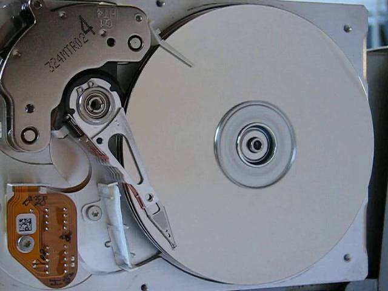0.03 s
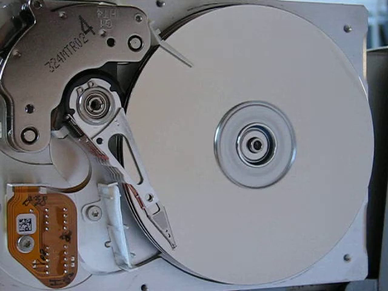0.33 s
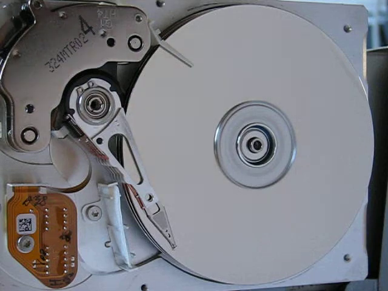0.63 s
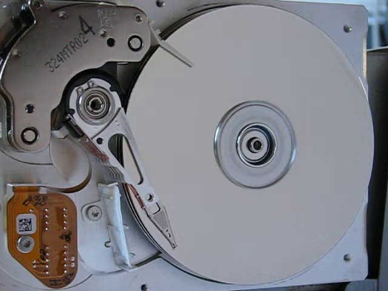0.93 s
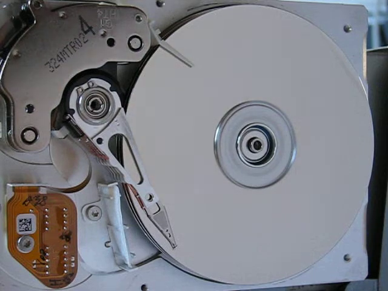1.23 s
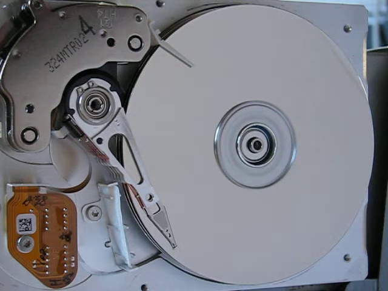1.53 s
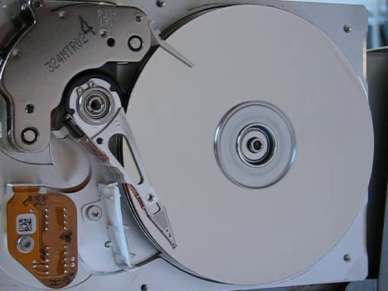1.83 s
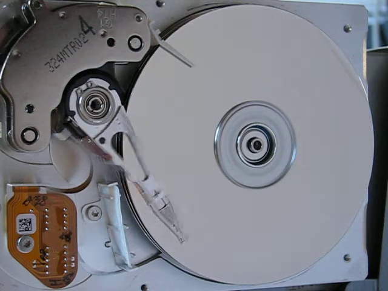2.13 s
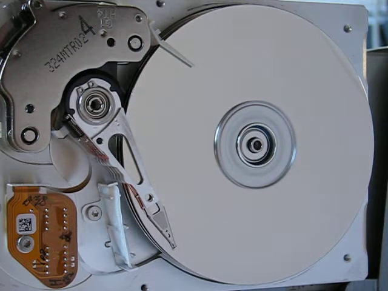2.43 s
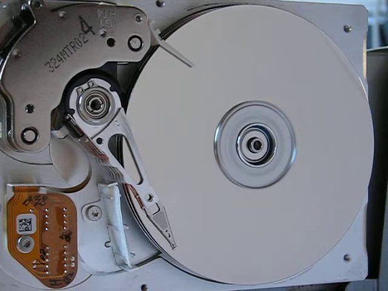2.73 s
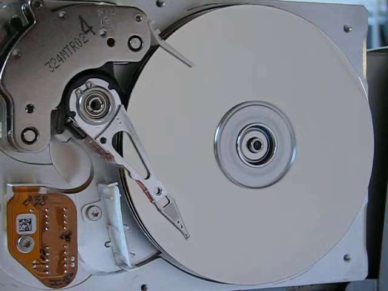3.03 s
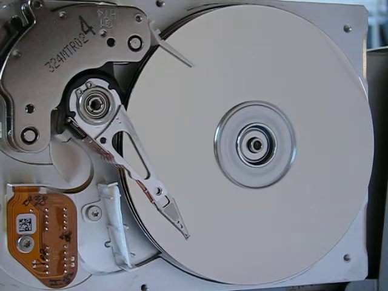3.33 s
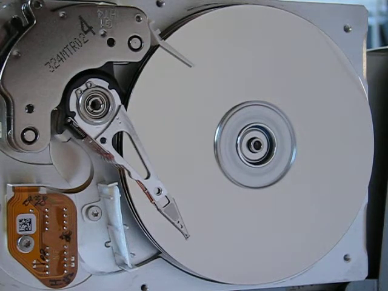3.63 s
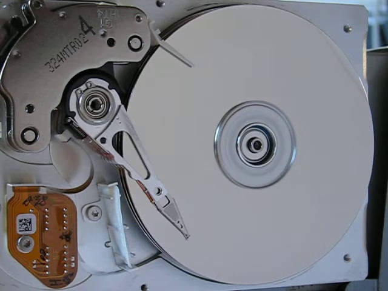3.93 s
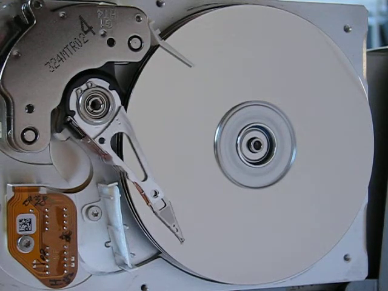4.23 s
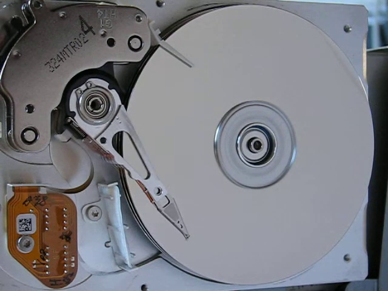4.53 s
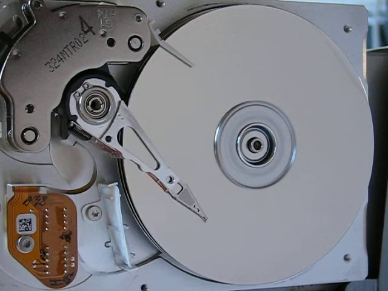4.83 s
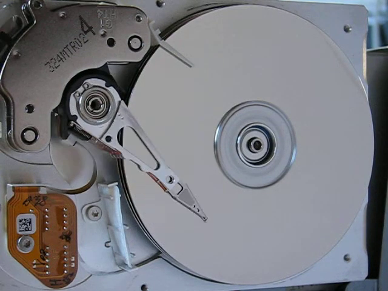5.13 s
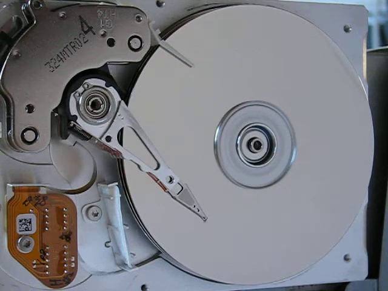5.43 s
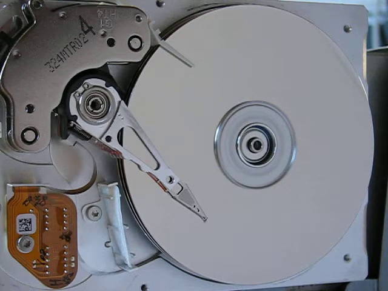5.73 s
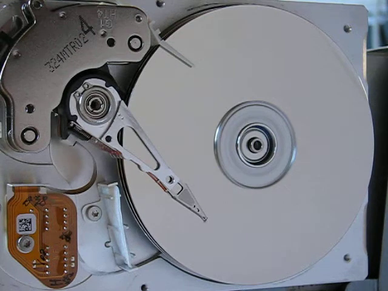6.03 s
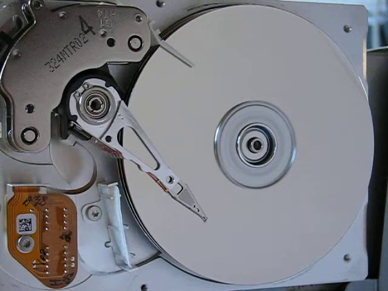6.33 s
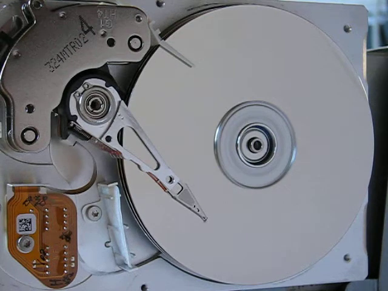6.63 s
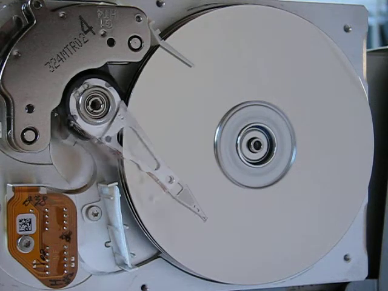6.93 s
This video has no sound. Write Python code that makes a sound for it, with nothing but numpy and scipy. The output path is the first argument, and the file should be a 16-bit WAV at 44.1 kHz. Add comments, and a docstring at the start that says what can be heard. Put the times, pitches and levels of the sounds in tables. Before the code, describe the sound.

An open hard drive hisses and whirs steadily up close, with a thin on-and-off whine and irregular clusters of read arm clicks.

```python
"""An opened hard drive at 5400 rpm, close up, just under a stereo microphone.
As the level fades in, air torn along by the platters is already hissing in the case, bearing and motor
add steady tones, and the head assembly whines on a track, as it will on and off throughout.
From about one second the read arm seeks in irregular clusters, three kicks of its voice coil a seek.
Near five seconds comes a faint rising squeak; a last cluster of seeks falls around seven."""
import sys
import numpy as np
from scipy import signal
from scipy.fft import rfft, irfft, next_fast_len
from scipy.io import wavfile
from scipy.ndimage import uniform_filter1d

SR = 44100
rng = np.random.default_rng(int(sys.argv[2]) if len(sys.argv) > 2 else 0)


def file_out(sig):
    """Save sig as 16-bit WAV at sys.argv[1]."""
    # one column per channel
    cols = np.atleast_2d(sig).T
    # limit, then scale
    lim = np.clip(cols, -1, 1)
    pcm = np.round(lim * 32767).astype(np.int16)
    wavfile.write(sys.argv[1], SR, pcm)


N = 311787
T = np.arange(N) / SR
SPIN_HZ = 90.02
SERVO_HZ = 96 * SPIN_HZ  # how often the servo corrects the head

# Air rushing off the platters. Each row: frequency in Hz, left and right level in dB per Hz.
AIR_SPECTRUM = [(25, -95, -98), (50, -97, -100), (90.5, -79, -81.5), (486, -76.5, -79), (1130, -79.5, -81),
                (2000, -76.5, -76.5), (2850, -82, -82), (3920, -82, -80), (4720, -75.5, -79),
                (6930, -77, -78.5), (8400, -86, -82.5), (10100, -90.5, -100), (11600, -88, -103),
                (13500, -105, -110), (15800, -108, -111)]
# Resonances of platters and case, stirred by the air.
# Each row: frequency in Hz, width in Hz, left and right level in dB per Hz.
CASE_MODES = [(541.3, 17, -71.5, -71), (2454, 513, -88, -69), (3350, 520, -76, -77.5),
              (5310, 710, -75, -86), (7620, 630, -99, -75), (10910, 540, -81, -91.5),
              (11480, 140, -79.5, -91)]
# How alike the air sounds on the microphone's two sides. Each row: frequency in Hz, correlation 0-1.
AIR_CORRELATION = [(100, 0.98), (1900, 0.96), (2450, 0.67), (2800, 0.27), (3100, 0.6), (3900, 0.18),
                   (4500, 0.67), (7700, 0.67), (9000, 0.2), (15000, 0.1)]
# Ball bearing tones. Each row: frequency in Hz, left and right level in dB, left lead in radians.
BEARING_TONES = [(543, -58, -59, 0.0), (1373, -61, -64, 0.0), (2160, -61, -58, -0.4),
                 (3128, -65, -59, -0.0), (3170, -71, -61, 0.1), (3498, -56, -58, -0.9),
                 (3586, -64, -62, -0.6), (3650, -59, -60, -0.5), (4172, -74, -59, 0.5),
                 (4322, -64, -62, 0.3), (5013, -55, -59, 0.2), (5101, -53, -59, 0.7), (5215, -49, -59, 0.2),
                 (6149, -60, -65, 0.2), (6481, -56, -61, 0.9), (6779, -53, -57, -0.3),
                 (7574, -65, -59, 0.4), (7822, -65, -56, 0.7), (10950, -62, -75, -0.1),
                 (11160, -68, -80, 0.4)]
# Motor and servo tones locked to the spindle.
# Each row: multiple of the spin rate, left and right relative level in dB, left lead in radians.
MOTOR_TONES = [(1, -71, -75, -0.1), (3, -65, -69, -0.1), (96, -63, -60, 3.0), (120, -49, -69, 1.5),
               (144, -65, -83, -0.1), (160, -72, -72, 0.2), (168, -77, -72, -0.3)]
# The head singing as it holds a track. Each row: start and end in seconds, relative level in dB.
TRACK_HOLDS = [(0, .61, -41.5), (.6, 0.943, -40), (2.098, 2.157, -37.5), (2.37, 2.418, -42),
               (2.487, 2.534, -38.5), (2.715, 2.784, -36.5), (3.064, 3.151, -38.5), (3.675, 3.723, -38),
               (3.82, 3.91, -39), (4.18, 4.309, -40.5), (4.52, 4.559, -38.5), (4.697, 4.797, -40.5),
               (4.918, 5.01, -46), (5.122, 5.162, -43), (5.35, 5.56, -46), (5.647, 5.933, -46),
               (6.09, 6.465, -46), (6.545, 6.68, -46), (6.935, 6.99, -41)]
# Where the arm sits. Each row: start in seconds, position from 0 at the rim to 1 at mid-platter.
ARM_POSITIONS = [(0, 0), (3.04, .3), (4.69, 0), (4.83, 1)]
# Faint track-to-track steps. Each row: start in seconds, relative level in dB.
TRACK_STEPS = [(.478, -28), (2.02, -32), (2.278, -31), (2.446, -37), (4.038, -35), (4.126, -35)]
# Seeks of the arm. Each row: start in seconds, travel time in seconds, relative level in dB.
ARM_SEEKS = [(.941, 0.0017, -24), (2.068, 0.0044, -25.5), (2.1015, 0.0045, -26.5), (2.1345, 0.0048, -26.5),
             (2.162, .0043, -27), (2.1768, 0.0059, -28), (2.7904, 0.0043, -27), (3.0, 0.00575, -30),
             (3.0424, 0.0051, -28), (3.9716, .0053, -27.5), (3.9881, 0.0055, -26.5),
             (4.0503, 0.0054, -26.5), (4.0794, .0058, -30), (4.186, 0.0053, -27.5), (4.327, .0045, -25),
             (4.3544, 0.0057, -27.5), (4.6964, .0051, -28), (4.8088, 0.0049, -27), (4.83, 0.0072, -30),
             (6.8715, 0.0074, -28.5), (6.912, .0055, -29.5), (6.9295, .0058, -30), (6.936, .0028, -31),
             (7.049, 0.0068, -29)]
# Resonances rung by a kick of the voice coil.
# Each row: frequency in Hz, width in Hz, left and right relative level in dB.
ACTUATOR_MODES = [(1400, 1400, -17.5, -21.5), (2630, 300, -14.5, -11), (3420, 810, -13, -10),
                  (4500, 500, -18, -17.5), (5230, 270, -0.5, -14), (5480, 350, -4, -19),
                  (5737, 200, -2, -3.5), (6270, 910, -12.5, -21), (7750, 880, -19, -8.5),
                  (9300, 2900, -21.5, -33), (10730, 220, -3, -23), (11200, 1500, -18.5, -36),
                  (14150, 350, -27, -30), (15400, 700, -32, -30)]
# The squeak's two tones. Each row: start and length in seconds, first and last pitch in Hz, level in dB.
SQUEAK_GLIDES = [(5.045, .028, 1900, 2500, -38), (5.05, .024, 517, 700, -44)]
# The recorder's fade-in. Each row: time in seconds, gain in dB.
FADE_IN = [(.072, -8.5), (.2, -7), (.4, -4.2), (.55, -1.5), (.7, 0.5)]


def undb(db):
    """Decibels to gain."""
    return np.exp(np.asarray(db) * (np.log(10) / 20))


def drift(rate):
    """A smooth random curve of spread near 1 that changes about `rate` times a second."""
    held = np.repeat(rng.standard_normal(int(rate * N / SR) + 3), 8)
    smooth = 1.3 * uniform_filter1d(uniform_filter1d(held, 8), 8)
    return np.interp(T * rate + rng.random(), np.arange(len(smooth)) / 8, smooth)


def curves(hz, table):
    """A table's columns, interpolated over log frequency."""
    points, *columns = np.transpose(table)
    return np.array([np.interp(np.log(hz + 1), np.log(points), column) for column in columns])


def resonances(hz, modes):
    """Left and right power response of steep-sided resonances."""
    return sum(undb([[left], [right]]) ** 2 / (1 + (2 * (hz - centre) / width) ** 2) ** 2
               for centre, width, left, right in modes)


def minimum_phase(power, size):
    """Impulse responses that have this power spectrum and ring only after the blow."""
    cepstrum = irfft(np.log(power) / 2)
    cepstrum[:, 1:size // 2] *= 2
    cepstrum[:, size // 2 + 1:] = 0
    return irfft(np.exp(rfft(cepstrum)))


def convolve(sound, response):
    """Play a sound through a pair of impulse responses, scaled to a mean energy of 1."""
    response = response / np.sqrt(np.sum(response ** 2) / 2)
    return signal.fftconvolve(np.atleast_2d(sound), response, axes=1)[:, :N]


def tone(hz, left_db, right_db, lead):
    """A sine on a pitch curve, reaching the microphone's left side `lead` radians early."""
    turns = np.cumsum(hz) / SR + rng.random()
    phase = 2 * np.pi * turns + np.array([[lead], [0]])
    return np.sqrt(2) * undb([[left_db], [right_db]]) * np.sin(phase)


def add(track, start, sound):
    """Mix a sound into a track at `start` seconds."""
    i = min(int(start * SR), N)
    track[i:i + len(sound)] += sound[:N - i]


def air_rush(flutter_db=0.81, swell_db=0.13, throb_depth=0.043):
    """Turbulent air coloured by the case; each octave flutters, and all of it throbs once a turn."""
    size = next_fast_len(N)
    hz = np.fft.rfftfreq(size, 1 / SR)
    alike = np.clip(curves(hz, AIR_CORRELATION)[0], 0, 1)
    mid, side = rfft(rng.standard_normal((2, size)))
    noise = mid * np.sqrt((1 + alike) / 2) + np.array([[1], [-1]]) * side * np.sqrt((1 - alike) / 2)
    power = undb(curves(hz, AIR_SPECTRUM)) ** 2 + resonances(hz, CASE_MODES)
    air = noise * np.sqrt(power * SR / 2)
    octave = np.floor(np.log2(np.maximum(hz / 250, 1)))
    bands = (irfft(air * (octave == k), size)[:, :N] for k in np.unique(octave))
    rush = sum(band * undb(flutter_db * drift(35)) for band in bands)
    throb = 1 + throb_depth * np.sin(2 * np.pi * SPIN_HZ * T)
    return rush * undb(swell_db * drift(4)) * throb


def bearing(slip=0.000298, waver_db=0.8):
    """The bearing's tones waver as the balls slip."""
    return sum(tone(hz * (1 + slip * drift(20)), *stereo) * undb(waver_db * drift(12))
               for hz, *stereo in BEARING_TONES)


def motor(gain_db=-0.7, waver_db=1.5):
    """Motor and servo tones waver in level but stay locked to the spindle's speed."""
    spin_hz = SPIN_HZ * (1 + 0.0001 * drift(6))
    return undb(gain_db) * sum(tone(multiple * spin_hz, *stereo) * undb(waver_db * drift(15))
                               for multiple, *stereo in MOTOR_TONES)


def head_whine(grow_s=0.02, partner_grow_s=0.043, stop_s=0.0025, waver_db=1.84, chatter_depth=0.12):
    """A head resonance builds under the servo, beats with a slower partner and chatters once a turn."""
    head_level, partner_level, whistle_level = np.zeros((3, N))
    for start, end, db in TRACK_HOLDS:
        position = [place for since, place in ARM_POSITIONS if since <= start][-1]
        t = np.arange(int((end - start + 10 * stop_s) * SR)) / SR
        release = np.exp(-np.maximum(t - (end - start), 0) / stop_s)
        swell, slow_swell = (release * (1 - np.exp(-t / rise)) for rise in (grow_s, partner_grow_s))
        add(head_level, start, swell * undb(db))
        # further in from the rim, the partner fades and the high whistle grows
        add(partner_level, start, slow_swell * undb(np.interp(position, (0, 1), (-42.5, -53.5))))
        add(whistle_level, start, swell * undb(np.interp(position, (0, 1), (-66, -58))))
    head_hz = 5470 + 7 * drift(50)
    partner_hz = 5410 + 10 * drift(20)
    # the servo works in steps, mirroring both tones about its rate and the head's about twice its rate
    head = tone(head_hz, left_db=3, right_db=-4.5, lead=0.86)
    head += tone(SERVO_HZ - head_hz, left_db=-16.5, right_db=-10.5, lead=0.1)
    head += tone(SERVO_HZ + head_hz, left_db=-20.5, right_db=-22, lead=1.4)
    partner = tone(partner_hz, left_db=2, right_db=-7, lead=0.96)
    partner += tone(SERVO_HZ - partner_hz, left_db=-8, right_db=-2, lead=0.1)
    whistle = tone(2 * SERVO_HZ - head_hz, left_db=-2, right_db=-13, lead=-0.5)
    whine = (head_level * head + whistle_level * whistle) * undb(waver_db * drift(50))
    whine += partner_level * partner * undb(waver_db * drift(40))
    chatter = 1 + chatter_depth * np.sin(2 * np.pi * SPIN_HZ * T)
    return chatter * whine


def kick(t, rise_s=0.00049):
    """The force of one voice coil kick, starting at t = 0."""
    age = np.maximum(t, 0) / rise_s
    return age * np.exp(1 - age)


def ring(t, hz, t60, push_s):
    """A mode, slightly detuned each time, builds during the push and then rings out."""
    envelope = np.minimum(t / push_s, 1) * np.exp(-np.log(1000) * np.maximum(t - push_s, 0) / t60)
    return envelope * np.sin(2 * np.pi * hz * (1 + 0.008 * rng.standard_normal()) * t)


def braking(t, travel_s, typical_s=0.0052, scatter_db=1):
    """Braking bends arm and coil, and the recoil rocks the chassis."""
    doublings = np.log2(travel_s / typical_s)
    arm_db = -36 + 13.5 * doublings + rng.normal(0, scatter_db)  # longer seeks bend the arm more
    coil_db = -36.5 - 7 * abs(doublings) + rng.normal(0, scatter_db)  # strongest at the typical travel
    arm = undb(arm_db) * ring(t, hz=1845, t60=0.047, push_s=travel_s / 2)
    coil = undb(coil_db) * ring(t, hz=3420, t60=0.028, push_s=travel_s / 2)
    chassis = undb(-44) * np.sqrt(travel_s / typical_s) * ring(t, hz=136, t60=0.098, push_s=travel_s)
    return arm + coil + chassis


def arm_seeks(coast_force=0.2, case_db=-13, case_t60=0.087):
    """The coil kicks the arm off, reverses and stops it; a step to the next track is a single kick."""
    t = np.arange(int(0.15 * SR)) / SR
    drive, ringing = np.zeros((2, N))
    for start, travel_s, db in ARM_SEEKS:
        force = undb(-2) * kick(t) + undb(-2) * kick(t - travel_s / 2) + undb(2) * kick(t - travel_s)
        force += coast_force * (t < travel_s)
        force /= np.sqrt(np.sum(force ** 2) / (travel_s * SR))
        rattle = rng.choice([-1, 1], len(t))  # each kick is a short rattle of current steps
        add(drive, start, undb(db) * force * rattle)
        add(ringing, start + travel_s / 2, braking(t, travel_s))
    for start, db in TRACK_STEPS:
        add(drive, start, undb(db) * kick(t) * rng.choice([-1, 1], len(t)))
    actuator_power = resonances(np.fft.rfftfreq(2048, 1 / SR), ACTUATOR_MODES)
    clicks = convolve(drive, minimum_phase(actuator_power, size=2048))
    # the dense modes of the casting smear each click a little
    case_tail = rng.standard_normal((2, len(t))) * np.exp(-np.log(1000) * t / case_t60)
    return clicks + undb(case_db) * convolve(clicks, case_tail) + ringing


def squeak():
    """Two faint, brief tones glide upward, dead centre."""
    track = np.zeros(N)
    for start, length, first_hz, last_hz, db in SQUEAK_GLIDES:
        hz = np.linspace(first_hz, last_hz, int(length * SR))
        glide = np.sin(2 * np.pi * np.cumsum(hz) / SR)
        add(track, start, undb(db) * np.hanning(len(hz)) * glide)
    return track


def scene():
    """The open drive as it reaches the microphone just above it."""
    return air_rush() + bearing() + motor() + head_whine() + arm_seeks() + squeak()


def record(dry, open_s=0.072, top_hz=15850):
    """The recorder opens after an instant of silence, fades in and cuts the top."""
    times, db = np.transpose(FADE_IN)
    gain = undb(np.interp(T, times, db)) * (T > open_s)
    lowpass = signal.ellip(10, 0.1, 80, top_hz, fs=SR, output="sos")
    return signal.sosfilt(lowpass, dry * gain)


dry = scene()
out = record(dry)
file_out(out)
```